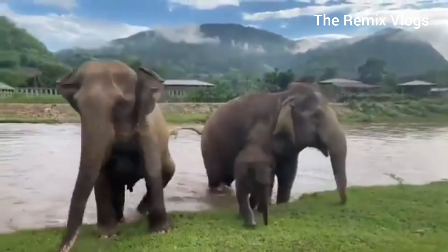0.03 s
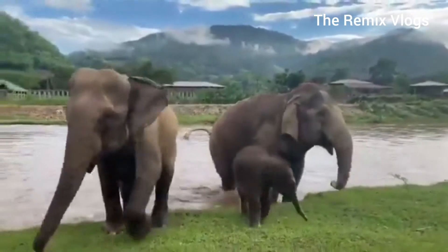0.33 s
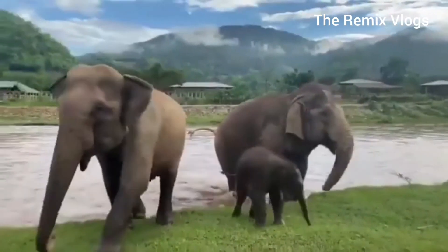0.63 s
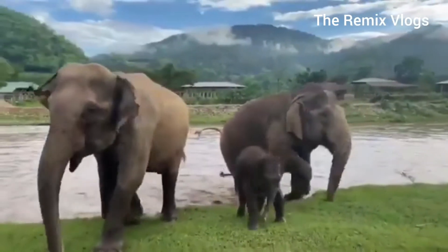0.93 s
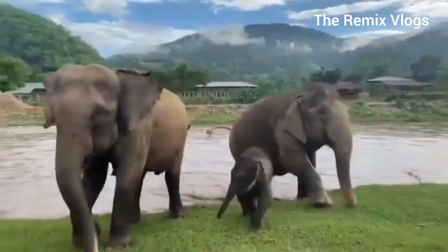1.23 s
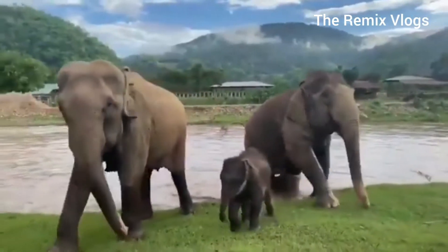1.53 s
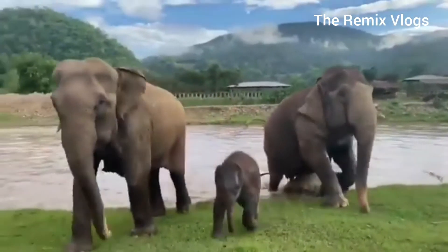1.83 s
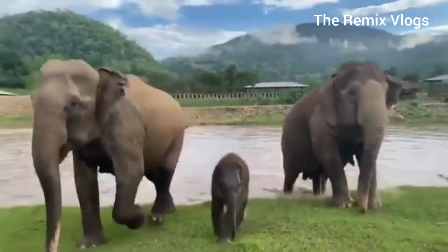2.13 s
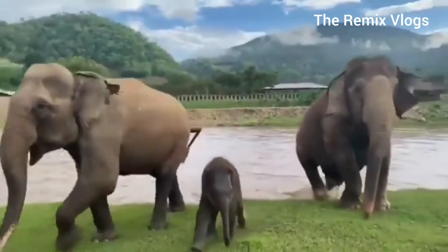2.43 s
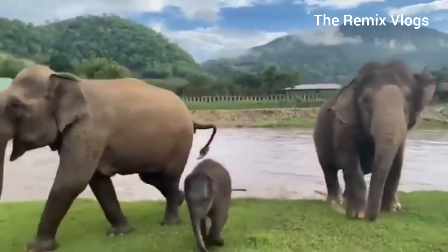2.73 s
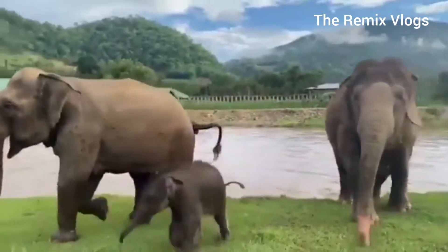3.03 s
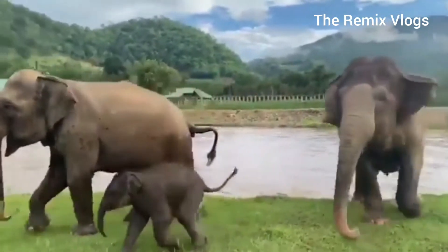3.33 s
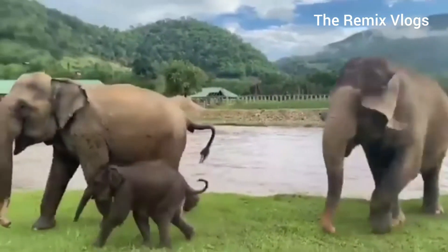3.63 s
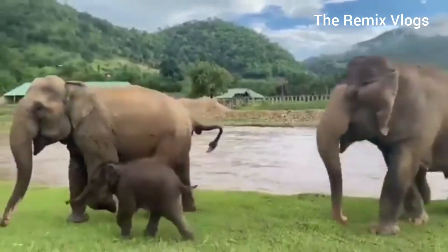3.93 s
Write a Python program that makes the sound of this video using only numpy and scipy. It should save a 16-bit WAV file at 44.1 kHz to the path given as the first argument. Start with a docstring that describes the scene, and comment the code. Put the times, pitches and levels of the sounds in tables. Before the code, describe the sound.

Elephant blowing, crying out and rumbling deeply while legs slosh through a shallow river.

```python
"""Elephants leaving a river

One elephant blows air and gives a rough, falling cry. A long rumble follows: its throat
pulses about 28 times a second, making a deep tone in the chest and a rattle in the mouth.
Water sloshes round their legs, with a few soft thumps, light wind and the river behind."""
import sys
import numpy as np
from scipy import signal
from scipy.fft import rfft, irfft, next_fast_len
from scipy.io import wavfile
from scipy.ndimage import uniform_filter1d, map_coordinates

SR = 44100
rng = np.random.default_rng(int(sys.argv[2]) if len(sys.argv) > 2 else 0)


def unload_wav(signal):
    """Save mono or channel-first audio to the path in sys.argv[1] as 16-bit WAV at rate SR, clipped to [-1, 1]."""
    wavfile.write(
        sys.argv[1],
        SR,
        np.round(np.clip(np.atleast_2d(signal).T, -1, 1) * 32767).astype(np.int16),
    )


N = 176400

# The pitch at which the mouth rings during the rumble: time_s, pitch_hz
MOUTH_RING = [(1.5, 590), (1.75, 630), (1.97, 666), (2.18, 712), (2.33, 688), (2.41, 645), (2.8, 605),
              (3.05, 618), (3.3, 632), (4.0, 638.7)]


def rumble():
    """Slow throat pulses drive the chest tone, the growl and the rattle."""
    # How fast the throat pulses: time_s, rate_hz
    pulse_rate = [(1.45, 26.95), (1.65, 27.52), (1.85, 29.46), (2.0, 30.3), (2.25, 30.3), (2.5, 29.32),
                  (2.75, 27.99), (2.95, 26.69), (3.15, 27.62), (3.3, 27.03), (3.55, 26.49), (3.75, 25.68),
                  (4.0, 23.0)]
    rate_hz, = curves(pulse_rate)
    cycles = np.cumsum(rate_hz) / SR
    cycles -= cycles[round(pulse_rate[0][0] * SR)] + .08  # count from the rumble's start
    return chest(cycles, rate_hz) + growl(cycles, rate_hz) + rattle(cycles)


def chest(cycles, rate_hz):
    """The deep chest tone is made of harmonics: clean tones at 2 to 6 times the pulse rate."""
    # Strength of the harmonics: time_s, fourth_db, third_db, fifth_db
    harmonics = [(1.45, -50, -55, -66), (1.52, -29, -41, -32.5), (1.57, -18.5, -29.5, -45),
                 (1.7, -16.5, -27.5, -37.5), (1.97, -23.5, -29, -35.5), (2.2, -18, -29, -38.5),
                 (2.45, -19, -27, -39), (2.75, -19, -29, -42.5), (2.97, -21.5, -33.5, -47),
                 (3.28, -22.5, -32, -42), (3.5, -26, -33.5, -30.5), (3.73, -24.5, -38, -35),
                 (3.86, -27, -35.5, -33.5), (4.0, -26, -41, -26.5)]
    fourth, third, fifth = levels(harmonics)
    turn_hz = 136.6  # harmonics above this swing against those below
    tone = np.zeros(N)
    for k, gain in enumerate([third * amp(-1.5), third, fourth, fifth, fifth * amp(-9)], 2):
        lag = np.pi / 2 * (1 + np.tanh((k * rate_hz - turn_hz) / 5))
        tone += gain * amp(0.85 * wobble(12)) * np.sin(2 * np.pi * k * cycles - lag)
    return -np.sqrt(2) * tone


def growl(cycles, rate_hz):
    """Higher harmonics waver, and grow strong where the throat and mouth ring."""
    # Ringing of the throat: time_s, level_db, pitch_hz
    throat_ring = [(1.45, -68, 243.3), (1.6, -35.5, 242), (1.83, -34.5, 270), (1.93, -35.5, 295),
                   (2.05, -29.5, 299), (2.22, -29, 284), (2.4, -34.5, 278), (2.6, -37.5, 283.6),
                   (3.05, -41.5, 296.6), (3.35, -48, 290), (4.0, -53.5, 300)]
    # What the throat lets through around that pitch: pitch_hz, gain_db
    throat_colour = [(170, -9), (215, -20.5), (345, -10.5), (400, -19.5), (450, -12.5), (520, -19),
                     (1000, -31.5)]
    # Growl in the mouth: time_s, level_db
    mouth_level = [(1.47, -77), (1.6, -37), (1.68, -46), (1.76, -33.5), (1.89, -33.5), (1.903, -25.5),
                   (1.98, -27), (2.1, -39), (2.19, -35.5), (2.23, -43), (2.27, -30), (2.37, -47),
                   (2.41, -31), (2.47, -36.5), (2.72, -50), (3.0, -45), (3.2, -33)]
    # A thin tone that sings out briefly: time_s, level_db
    thin_level = [(1.68, -47), (1.75, -36), (1.81, -39.5)]
    throat_width_hz, mouth_width_hz, thin_hz = 11.4, 42, 446
    mouth_hz, = curves(MOUTH_RING)
    throat_hz = curves(throat_ring)[1]
    throat_gain, = levels([(s, db) for s, db, hz in throat_ring])
    throat, mouth = np.zeros(N), np.zeros(N)
    for k in range(7, 36):
        hz = k * rate_hz
        waver = .45 * (k / 20) * (wobble(11) + .4 * wobble(60))
        gain = amp(4 * np.sqrt(k / 20) * flutter(11))
        harmonic = gain * np.sin(2 * np.pi * (k * cycles + rng.random()) + waver)
        peak = 1 / (1 + ((hz - throat_hz) / throat_width_hz) ** 2)
        throat += harmonic * (peak + amp(np.interp(hz, *np.transpose(throat_colour))))
        mouth += harmonic / (1 + ((hz - mouth_hz) / mouth_width_hz) ** 2)
    thin = unit(np.sin(2 * np.pi * thin_hz * np.arange(N) / SR + .3 * wobble(40)))
    thin *= levels(thin_level)[0]
    return throat_gain * unit(throat) + levels(mouth_level)[0] * unit(mouth) + thin


def rattle(cycles):
    """Each pulse rings the mouth with a small upward flick, loudest as the rumble slackens."""
    # The rattle: time_s, level_db
    loudness = [(1.5, -44.5), (2.4, -43.5), (2.72, -65), (2.85, -36), (2.96, -36.5), (3.04, -29),
                (3.1, -37.5), (3.23, -41), (3.265, -31.5), (3.37, -41), (3.41, -28), (3.45, -33.5),
                (3.49, -30), (3.56, -31), (3.66, -40.5), (3.76, -37.5), (3.85, -42), (3.915, -35),
                (3.955, -43), (4.0, -37)]
    # Higher rings of the mouth, against the lowest: pitch_hz, gain_db
    upper_rings = [(920, -22), (1170, -28), (2080, -31)]
    lead, rise, fall = 0.35, 0.14, 0.4  # shares of a cycle; the rattle leads the chest tone
    offset = (cycles + lead + 0.011 * wobble(27) + .5) % 1 - .5
    pulse = np.exp(-(offset / np.where(offset < 0, rise, fall)) ** 2)
    swell = unit(pulse + 0.07) * amp(1.2 * flutter(27))
    flick = 1 + .14 * np.minimum(offset - .1, .1)
    ring_hz = curves(MOUTH_RING)[0] * flick * (1 + 0.02327 * wobble(110))
    ring = np.sqrt(2) * np.sin(2 * np.pi * np.cumsum(ring_hz) / SR)
    upper = ringing_air(upper_rings, width_hz=82)
    return swell * levels(loudness)[0] * (ring + upper) + squeaks()


def squeaks():
    """The mouth's higher rings give brief squeaks."""
    # Squeaks: middle_s, peak_db, pitch_hz
    events = [(1.834, -42, 2050), (1.868, -37.5, 2080), (2.856, -39, 2100), (3.27, -43, 2130),
              (3.375, -43.5, 2130), (3.455, -44, 2080), (3.564, -35.5, 1170), (3.637, -38, 1180)]
    half_length_s = 0.0098
    t = np.arange(N) / SR
    return sum(amp(db) * np.exp(-((t - s) / half_length_s) ** 2)
               * np.sin(2 * np.pi * hz * t + wobble(300)) for s, db, hz in events)


def cry():
    """A fluttering, falling call, made rough by in-between tones and noise."""
    # The cry's fall: time_s, pitch_hz
    pitch = [(.93, 490), (.97, 494), (1.02, 496.5), (1.08, 508), (1.13, 489.6), (1.17, 489.4),
             (1.21, 479.2), (1.25, 457.5), (1.3, 460.5), (1.335, 449), (1.42, 447.5)]
    # Its three main harmonics: time_s, first_db, second_db, third_db
    harmonics = [(.948, -66, -56, -51), (.963, -33, -25.5, -47), (1.03, -36, -25, -48),
                 (1.09, -33, -18, -50), (1.135, -32.5, -31, -53), (1.155, -33.5, -16, -36.5),
                 (1.195, -27.5, -29, -44), (1.25, -22.5, -20, -34), (1.295, -20.5, -18.5, -38.5),
                 (1.31, -20, -45, -30.5), (1.325, -18.5, -21, -42), (1.355, -33, -21.5, -36.5),
                 (1.375, -36, -42, -51), (1.395, -50, -24, -50), (1.43, -68, -69, -66)]
    # Faint tones, against the second harmonic: pitch_multiple, gain_db
    faint_tones = [(2.5, -24.5), (4, -32)]
    # The cry splits, adding a tone between the first two harmonics: time_s, level_db
    split = [(1.06, -42), (1.1, -35), (1.17, -48.5), (1.25, -46)]
    phase = 2 * np.pi * np.cumsum(curves(pitch)[0] * (1 + 0.0068 * wobble(130))) / SR
    gains = levels(harmonics)
    flutter_db = np.interp(np.arange(N) / SR, [1.13, 1.25], [3, 1]) * flutter(75)
    tone = sum(gain * amp(1.7 * flutter(110)) * np.sin(k * phase + 0.24 * (k / 2) ** 2 * wobble(120))
               for k, gain in enumerate(gains, 1))
    for k, db in faint_tones:
        tone += gains[1] * amp(db + 4 * flutter(40)) * np.sin(k * phase + .6 * wobble(90))
    tone += levels(split)[0] * np.sin(1.48 * phase + .3 * wobble(90))
    return np.sqrt(2) * tone * amp(flutter_db) + second_tone() + rasp(phase) + hoarse_start()


def second_tone():
    """A slightly higher tone beats against the cry, so the two throb together."""
    # The higher tone: time_s, pitch_hz, level_db
    path = [(0.931, 514, -39), (1.0, 531.3, -26.5), (1.09, 522, -28.5), (1.15, 534, -37.5),
            (1.221, 513, -29.5), (1.3, 485, -42)]
    phase = 2 * np.pi * np.cumsum(curves(path)[0] * (1 + 0.0116 * wobble(110))) / SR
    gain, = levels([(s, db) for s, hz, db in path])
    return gain * amp(2 * flutter(69.2)) * unit(np.sin(phase) + amp(4.5) * np.sin(2 * phase))


def rasp(phase):
    """Rough noise pulses in step with the cry, over a low rush."""
    # The two noises: time_s, rough_db, low_db
    loudness = [(.72, -57, -58), (.82, -39, -50), (.89, -34, -43), (.94, -39, -41), (1.0, -31.5, -33),
                (1.08, -32, -33), (1.16, -37, -44), (1.3, -38, -36.5), (1.35, -36, -36.5),
                (1.44, -50.5, -41)]
    # Tone colour of the rough noise: pitch_hz, gain_db
    rough_colour = [(200, -35.5), (380, -6.5), (560, 1), (760, -10), (1030, 0.5), (1300, -8), (1600, -7),
                    (2100, -14.5), (2600, -21.5), (3500, -20), (6000, -27.5), (10000, -43)]
    # Tone colour of the low rush: pitch_hz, gain_db
    low_colour = [(35, -34), (75, -9.5), (180, -1), (260, -9.5), (400, -32), (900, -77)]
    rough_gain, low_gain = levels(loudness)
    pulsing = rng.standard_normal(N) * (1 + 0.9 * np.sin(phase)) * amp(1.3 * flutter(80.85))
    rough = patchy(coloured(pulsing, rough_colour), depth_db=7.5)
    return rough_gain * rough + low_gain * noise(low_colour)


def hoarse_start():
    """The cry starts as rasping air that makes the throat ring."""
    # The hoarse air: time_s, level_db
    loudness = [(.8, -58), (.85, -35), (.895, -26), (.94, -42)]
    # Where the throat rings: pitch_hz, gain_db
    rings = [(585, -0.5), (750, -9), (870, -5), (1035, 0.5)]
    return levels(loudness)[0] * unit(ringing_air(rings, width_hz=57))


def blow():
    """Blown air hisses just before the cry."""
    # The hiss: time_s, level_db
    loudness = [(.6, -65), (.66, -38.5), (.71, -32.5), (.76, -39), (.82, -35.5), (.87, -39.5), (.93, -49)]
    # Its tone colour: pitch_hz, gain_db
    colour = [(470, -12), (800, -30), (909, 5), (1220, -8.5), (1400, 0), (1960, 0), (2650, -15),
              (2840, -11), (3620, 1), (4960, -1.5), (8660, -14.5), (11100, -11), (13500, -36)]
    return levels(loudness)[0] * patchy(noise(colour), depth_db=2.5) * amp(1.5 * wobble(49.9))


def slosh():
    """Legs stir the shallow water into swells of noise and bubbles."""
    # The sloshing: time_s, level_db
    loudness = [(0, -47), (.33, -50), (.42, -42), (.52, -45), (.63, -43.5), (.95, -63), (1.4, -47.5),
                (1.6, -54), (1.85, -44), (2.0, -46), (2.18, -43), (2.26, -36), (2.36, -41), (2.43, -38),
                (2.55, -43), (2.66, -48), (2.86, -38.5), (2.92, -44.5), (3.0, -38.5), (3.09, -49.5),
                (3.2, -45), (3.3, -51.5), (3.7, -52), (4.0, -63)]
    # Its tone colour: pitch_hz, gain_db
    colour = [(150, -13), (500, 5), (1000, 7.5), (2000, 4), (2800, -0.5), (4000, 1), (6300, -3.5),
              (7500, -10.5), (10500, -10.5), (13000, -17)]
    spray = rng.standard_normal(N) + amp(-21.5) * bubbles(count=1800, spread_db=7.5, life_cycles=19.0)
    return levels(loudness)[0] * amp(1.4 * wobble(45)) * patchy(coloured(spray, colour), depth_db=2.2)


def bubbles(count, spread_db, life_cycles):
    """Tiny bubbles ring at random times; the high ones fade fastest."""
    when, pitch, strength = rng.random(count), rng.standard_normal(count), rng.exponential(size=count)
    hz = np.clip(3200 * np.exp(.65 * pitch), 500, 12000)[:, None]
    gain = amp(spread_db * np.minimum(strength, 4))[:, None]
    n = np.arange(400)
    rings = gain * np.sin(2 * np.pi * hz * n / SR) * np.exp(-hz * n / SR / life_cycles)
    positions = (when * N).astype(int)[:, None] + n
    return unit(np.bincount(positions.ravel(), rings.ravel(), N)[:N])


def splashes():
    """Legs throw up small splashes, each a short burst of noise."""
    # Splashes: start_s, level_db, fade_s, centre_hz
    events = [(0.097, -36, 0.11, 2430), (1.494, -40.5, 0.2, 1920), (1.701, -42, 0.1, 4000),
              (2.254, -34, 0.051, 1500), (2.706, -41, 0.11, 4600), (3.119, -36, .1, 1850),
              (3.186, -41, 0.17, 4100), (3.479, -45, 0.09, 6240), (3.747, -43, 0.11, 3120)]
    # Their tone colour: centre_multiple, gain_db
    colour = [(.1, -14), (.6, -1), (1, -1), (1.5, -8), (4, -22)]
    return sum(amp(db) * burst(s, .003, 0.0036, fade_s) * noise([(k * hz, g) for k, g in colour])
               for s, db, fade_s, hz in events)


def thumps():
    """Dull knocks: a short tone, with more slap the harder they land."""
    # Thumps: start_s, tone_db, hold_s, fade_s, pitch_hz
    events = [(0.307, -32.5, 0.003, 0.05, 310), (3.124, -19, 0.008, 0.12, 315),
              (3.149, -23, .003, .09, 440), (3.857, -39, .02, 0.14, 227)]
    # Tone colour of the slap: pitch_multiple, gain_db
    colour = [(.2, -19), (.55, 1.5), (1.7, 1.5), (2.4, -12), (3.5, -15), (7, -30.5), (14, -49)]
    t = np.arange(N) / SR
    sound = np.zeros(N)
    for s, db, hold_s, fade_s, hz in events:
        tone = np.sin(2 * np.pi * hz * (t - s))
        slap = amp(8.5 + 0.38 * db) * noise([(k * hz, g) for k, g in colour])
        sound += amp(db) * burst(s, 0.00047, hold_s, fade_s) * (tone + slap)
    return sound


def river():
    """The river runs steadily behind, a soft, churning noise."""
    # Its tone colour: pitch_hz, gain_db
    colour = [(25, 3), (60, 0.5), (130, 8), (300, 2), (520, 6.5), (1000, -3), (2000, -13), (3000, -18.5),
              (4500, -20), (6500, -16), (8000, -31.5), (11000, -22.5), (13000, -59)]
    return amp(-43.5 + 1.2 * flutter(10)) * patchy(noise(colour), depth_db=8.5)


def wind():
    """Two light, low gusts blow at the start."""
    # The gusts: time_s, level_db
    loudness = [(0, -47), (.08, -40), (.2, -41.5), (.28, -59), (.48, -69), (.54, -46), (.66, -35),
                (.75, -80)]
    # Their tone colour: pitch_hz, gain_db
    colour = [(25, -20), (62, 5), (90, -10), (130, 4), (260, -9.5), (380, -18), (520, -3), (900, -51)]
    return levels(loudness)[0] * noise(colour) * amp(1.9 * wobble(21.2))


def ringing_air(rings, width_hz):
    """Noise that rings at a few pitches."""
    return sum(amp(db) * resonance(rng.standard_normal(N), hz, width_hz) for hz, db in rings)


def patchy(x, depth_db):
    """Make a sound louder and softer in random patches of time and pitch."""
    spectrum = signal.stft(x, nperseg=512)[2]
    patches = uniform_filter1d(rng.standard_normal(spectrum.shape), size=5, axis=0)
    patches = uniform_filter1d(patches, size=6, axis=1)
    gain = amp(depth_db * np.minimum(unit(patches), 1))
    return unit(signal.istft(spectrum * gain, nperseg=512)[1][:N])


def flutter(rate):
    """A random curve held between -1 and 1."""
    return np.tanh(wobble(rate))


def amp(db):
    """Decibels to gain."""
    return 10 ** (np.asarray(db) / 20)


def unit(x):
    """Scale to rms 1."""
    return x / np.sqrt(np.mean(x ** 2) + 1e-20)


def curves(rows):
    """One value per sample for each column after the time."""
    s, *cols = np.transpose(rows)
    return [np.interp(np.arange(N) / SR, s, c) for c in cols]


def levels(rows):
    """Gain curves from dB columns, fading to silence outside the rows."""
    t = np.arange(N) / SR
    inside = np.clip(np.minimum(t - rows[0][0], rows[-1][0] - t) * 20 + 1, 0, 1)
    return [amp(db) * inside for db in curves(rows)]


def wobble(rate):
    """A smooth random curve, rate knots a second."""
    return map_coordinates(rng.standard_normal(4096), [np.arange(N) * rate / SR], mode="wrap")


def coloured(x, points):
    """Causal filter through (Hz, dB) points; result at rms 1."""
    m = 2 * next_fast_len(N // 2 + 8192)
    f, db = np.transpose(points)
    cep = irfft(np.log(amp(np.interp(np.log(np.fft.rfftfreq(m, 1 / SR) + 1), np.log(f), db))))
    cep[1:m // 2] *= 2
    cep[m // 2 + 1:] = 0
    return unit(irfft(rfft(x, m) * np.exp(rfft(cep)), m)[:N])


def noise(points):
    """Coloured noise of rms 1."""
    return coloured(rng.standard_normal(N), points)


def resonance(x, hz, width_hz):
    """A steep resonance whose centre may move."""
    turn = np.exp(2j * np.pi * np.cumsum(hz * np.ones(N)) / SR)
    pole = np.exp(-np.pi * width_hz / SR)
    return unit(np.real(turn * signal.lfilter([1], np.poly([pole, pole]), x / turn)))


def burst(start, attack, hold, t60):
    """Attack, hold and release."""
    t = np.maximum(np.arange(N) / SR - start, 0)
    return (1 - np.exp(-t / attack)) * np.exp(-np.log(1000) * np.maximum(t - hold, 0) / t60)


def scene():
    """Everything in the open air, in one channel."""
    return (rumble() + cry() + blow() + slosh() + splashes() + river() + thumps() + wind())[None]


def record(dry):
    """Cut away the very highest treble."""
    top_hz = 13100
    m = next_fast_len(N + 8192)
    return irfft(rfft(dry, m) * (np.fft.rfftfreq(m, 1 / SR) < top_hz), m)[:, :N]


dry = scene()
out = record(dry)
unload_wav(out)
```